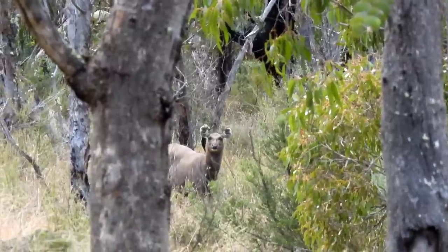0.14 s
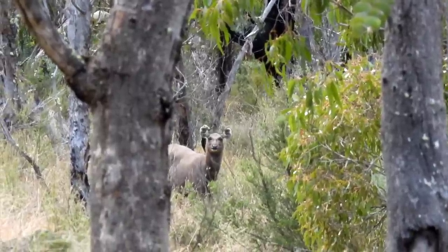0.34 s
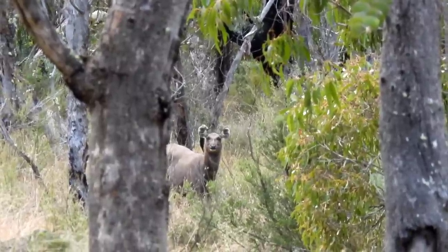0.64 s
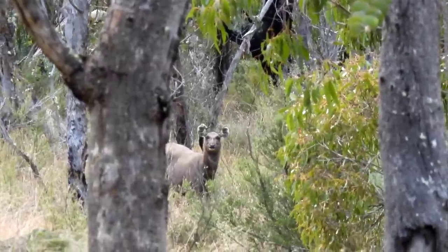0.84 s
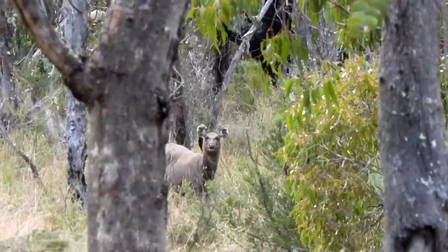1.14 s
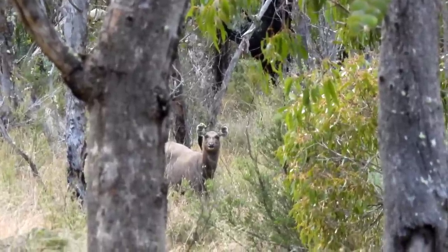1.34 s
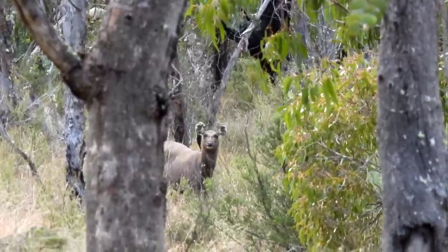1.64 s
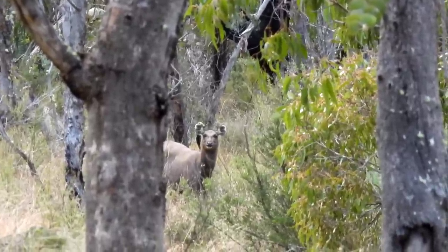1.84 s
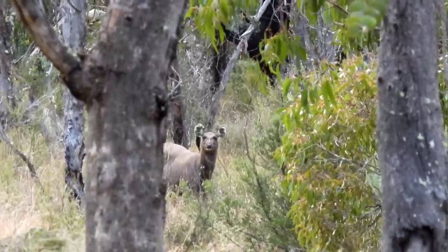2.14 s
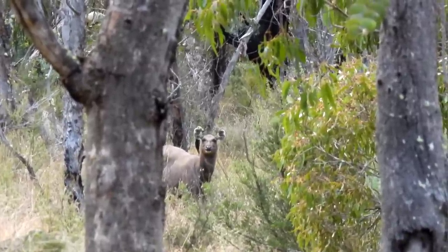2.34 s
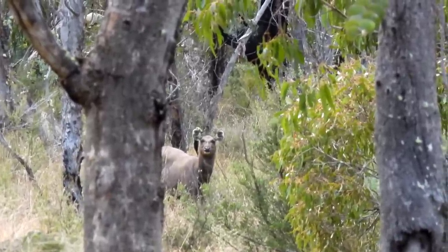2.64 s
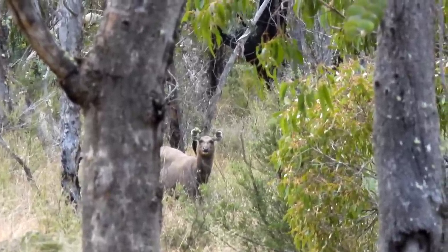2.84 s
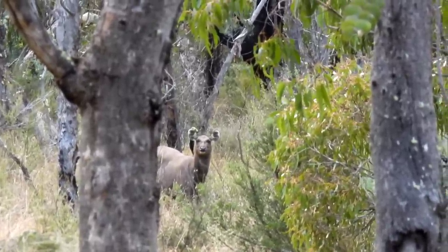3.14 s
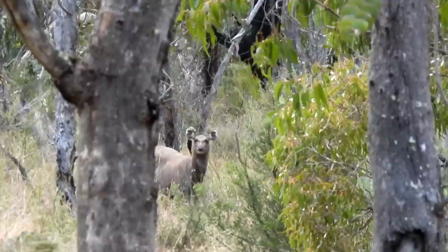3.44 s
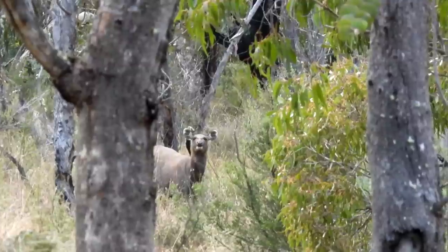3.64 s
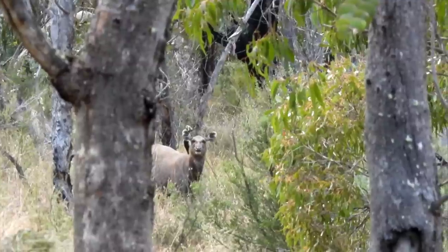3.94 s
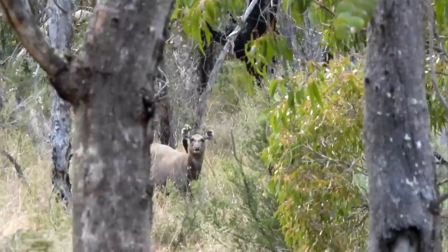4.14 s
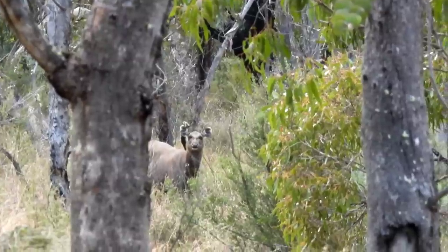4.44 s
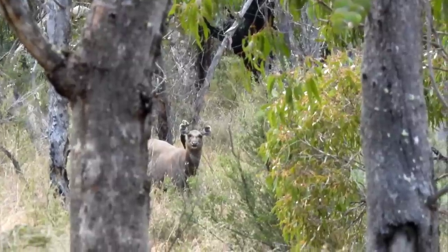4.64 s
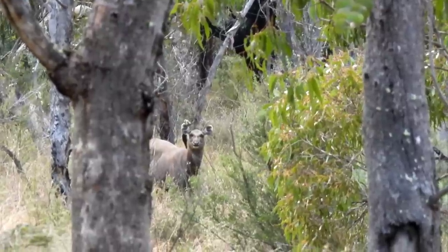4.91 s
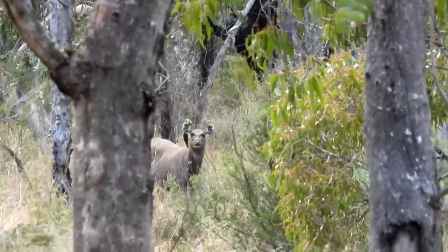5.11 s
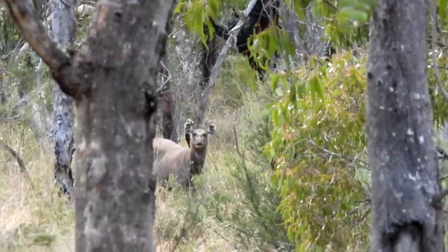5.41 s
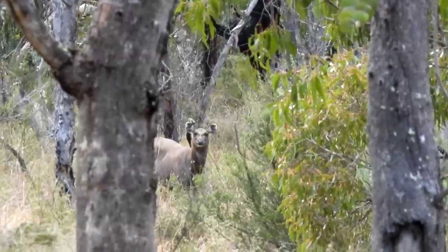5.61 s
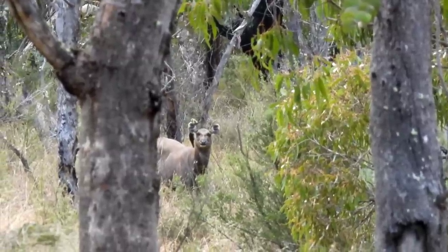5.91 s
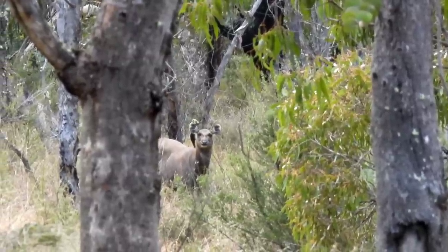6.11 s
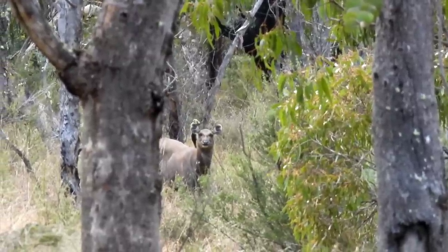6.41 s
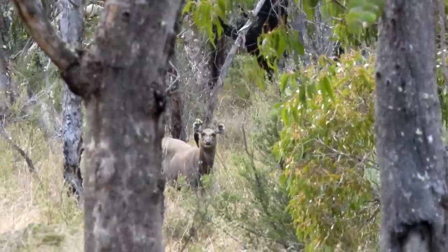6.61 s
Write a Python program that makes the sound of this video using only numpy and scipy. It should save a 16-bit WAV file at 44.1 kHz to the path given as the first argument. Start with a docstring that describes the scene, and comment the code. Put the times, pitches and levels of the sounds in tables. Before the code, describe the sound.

In open bushland, dry grass swishes and twigs tick close to the microphone during the first second over a soft steady breeze. A bird repeats short arched whistles while tiny high calls come faintly. Midway, a deer barks once, very short and loud, rasping then honking, with quick echoes off the trees. Afterwards a twig snaps and rapid high chips crowd in.

```python
"""Open bushland: at first dry grass swishes close by and twigs tick, over a steady breeze in the leaves.
A bird spread wide across the channels repeats an arched whistle; small birds call high up: gliding near-sines.
At 4 s a deer barks once: fold pulses and air noise ring its throat, then break into a clear honk.
Stands of trees throw the bark back as echoes and scatter; afterwards quick chips crowd in and a twig snaps."""
import sys
import numpy as np
from scipy import signal
from scipy.fft import rfft, irfft
from scipy.io import wavfile
from scipy.ndimage import uniform_filter1d, minimum_filter1d

SR = 44100
rng = np.random.default_rng(int(sys.argv[2]) if len(sys.argv) > 2 else 0)


def digitize_waveform(pressure):
    """Quantize a signal to 16-bit integers and store it at the path in sys.argv[1].

    Rows of a 2-D input are taken as channels; values are limited to [-1, 1].
    """
    field = np.atleast_2d(pressure).T
    bounded = np.clip(field, -1, 1)
    quanta = np.round(bounded * 32767).astype(np.int16)
    wavfile.write(sys.argv[1], SR, quanta)


N = 298116
TIME = np.arange(N) / SR


def amp(db):
    """Level law: decibels to amplitude gain."""
    return 10 ** (np.asarray(db) / 20)


def evened(x):
    """Power normalization: scales to rms 1."""
    return x / np.sqrt(np.mean(x ** 2) + 1e-20)


def read(points, hz):
    """Interpolation on a logarithmic frequency axis."""
    f, value = np.transpose(points)
    return np.interp(np.log(hz + 1), np.log(f + 1), value)


def add(mix, s, sound):
    """Superposition: adds a sound to the mix at second s."""
    start = round(s * SR)
    sound = sound[max(-start, 0):]
    part = mix[max(start, 0):][:len(sound)]
    part += sound[:len(part)]


def colour(x, points):
    """Linear filtering: multiplies the spectrum by a table of hz, gain_db."""
    hz = np.fft.rfftfreq(x.shape[-1], 1 / SR)
    return irfft(rfft(x) * amp(read(points, hz)), x.shape[-1])


def resonate(x, hz, width):
    """A resonance as a frequency-shifted one-pole filter; its centre may move."""
    turn = np.exp(2j * np.pi * np.cumsum(hz * np.ones(len(x))) / SR)
    r = np.exp(-np.pi * width / SR)
    baseband = signal.lfilter([1 - r], [1, -r], x / turn + 1e-18)
    return 2 * (turn * baseband).real


def wander(t, per_s):
    """Random modulation of about unit size: straight lines between per_s normal draws a second."""
    return np.interp((t - t[0]) * per_s, np.arange(512), rng.standard_normal(512))


def stereo(mid, side, left_db):
    """Sum and difference: left and right from a common and a differing part."""
    return np.array([(mid + side) * amp(left_db / 2), (mid - side) * amp(-left_db / 2)])


def scatter(x, t60_scale, build_s):
    """Diffuse scattering off trunks and leaves: sparse taps in two channels, each band decaying at its own rate."""
    # decay of the bush before scaling: hz, t60_s
    bush_t60 = [(200, 0.36), (1300, 0.92), (2700, 0.71), (4500, 0.8), (9000, 0.58)]
    taps = rng.choice([-1., 1.], (2, SR)) * (rng.random((2, SR)) < 3000 / SR)
    hz, t, z = signal.stft(taps, SR, nperseg=256)
    decay = amp(-60 * t / (t60_scale * read(bush_t60, hz)[:, None]))
    build_up = 1 - np.exp(-t / build_s)
    tail = signal.istft(z * decay * build_up, SR, nperseg=256)[1]
    return signal.fftconvolve(x[None], tail / np.linalg.norm(tail[0]), axes=1)[:, :len(x)]


def drifted(x, sway_s):
    """Phase modulation: moving air and leaves keep changing the path length, which blurs clear tones."""
    return np.interp(TIME + sway_s * wander(TIME, 60), TIME, x)


def deer():
    """Direct and scattered sound: the bark from near the middle, with near scatter, echoes and a faint tail."""
    # colour of the tail: hz, gain_db
    tail_colour = [(300, -4.5), (800, -4), (1000, -4), (1350, -4.5), (1900, 4.5), (2700, -2), (3500, 3),
                   (5000, -3), (9000, -12.5)]
    voice = bark()
    near = amp(-14.5) * scatter(voice, t60_scale=0.25, build_s=0.0081)
    far = amp(-18.0) * scatter(colour(voice, tail_colour), t60_scale=1.9, build_s=0.022)
    mid = voice + near[0] + drifted(echoes(voice), sway_s=.00005) + drifted(far[0], sway_s=0.00024)
    return stereo(mid, amp(-4) * (near[1] + far[1]), left_db=1.5)


def bark(puff_cycles=1.0, jitter=0.011, first_pulse=.06, honk_rough=0.086):
    """Source and filter: slaps of the vocal folds with puffs of air ring the throat, then clear to a tone."""
    # throat resonances before the mouth opening shifts them: hz, width_hz, relative_level_db
    throat_modes = [(312, 82, -52.5), (927, 61, -33), (1550, 154, -16), (1820, 250, -22.5),
                    (2614, 350, -19.5), (3270, 170, -30), (4700, 350, -37.5), (8460, 1100, -46)]
    # partials of the honk: multiple_of_pitch, relative_level_db
    honk_partials = [(2, -41.5), (3, -52.5), (4, -43), (6, -13.5), (8, -9), (9, -28), (10, -17), (11, -33),
                     (12, -38), (15, -28), (16, -34)]

    # one push of air
    attack_s, hold_s, release_s = 0.022, 0.031, .026
    t = np.arange(0, attack_s + hold_s + release_s, 1 / SR)
    released = np.maximum(t - attack_s - hold_s, 0) / release_s
    effort = np.minimum(t / attack_s, 1) * amp(0.5 - 15.5 * released)

    # partway through, the rasp breaks into the honk: 0 in the rasp, 1 in the honk
    break_after_s, break_s = .036, 0.0029
    clear = 1 / (1 + np.exp((break_after_s - t) / break_s))

    # the pitch climbs as the folds tighten, then holds; jitter fades as the tone clears
    slack_hz, tight_hz, tighten_s = 137.9, 167.26, .033
    hz = np.interp(t, [0, tighten_s], [slack_hz, tight_hz])
    turns = first_pulse + np.cumsum(hz * (1 + jitter * (1 - clear) * wander(t, 200))) / SR
    slaps = np.diff(np.floor(turns), prepend=0)
    puffs = (.2 + np.exp(-(turns % 1) / puff_cycles)) * rng.standard_normal(len(t))
    rasp_air, honk_air = .4, .7  # weight of the air noise
    airy = rasp_air + (honk_air - rasp_air) * clear
    drive = (1 - airy) * evened(slaps) + airy * evened(puffs)

    mouth = 0.96 + 1.36 * t  # the opening mouth raises the resonances
    bright_db = 1.5 * (1 - 2 * clear)  # the treble sinks as the tone clears
    rasp = np.zeros(len(t))
    for f, width, db in throat_modes:
        ringing = resonate(resonate(drive, f * mouth, width), f * mouth, 2 * width)
        rasp += amp(db + bright_db * (f > 2000)) * evened(ringing)

    honk = np.zeros(len(t))
    for k, db in honk_partials:
        partial = np.sqrt(2) * np.sin(2 * np.pi * (round(k) * turns + rng.random()))
        honk += amp(db) * partial * (1 + honk_rough * wander(t, 260))

    rasp_left_db, honk_db, honk_early_db = -6.5, -2.5, -23  # the early share already sounds in the rasp
    rasp_part = amp(rasp_left_db * clear) * rasp
    honk_part = amp(honk_db) * np.maximum(clear, amp(honk_early_db)) * honk
    out = np.zeros(N)
    add(out, 3.999, effort * (rasp_part + honk_part) * signal.windows.tukey(len(t), .04))
    # distance dulls the bark above this corner in Hz
    return signal.sosfilt(signal.butter(2, 10500, fs=SR, output="sos"), out)


def echoes(x, smear=1.0):
    """Delayed reflection: each stand of trees returns a firm echo and a smear from the trunks around it."""
    # stands of trees: delay_s, relative_level_db, spread_s
    stands = [(0.063, -13.5, 0.011), (.125, -25, .02), (0.191, -26.5, .02), (0.256, -28, .02),
              (.43, -38, .04), (0.548, -35.5, .06)]
    # colour of the echoes: hz, gain_db
    echo_colour = [(100, -12), (330, 10), (1000, 2), (1400, -6), (2000, 4.5), (2700, -10), (5000, -5.5),
                   (9000, -22)]
    t, response = np.arange(SR // 4) / SR, np.zeros(SR)
    for delay, db, spread in stands:
        trunks = rng.standard_normal(len(t)) * np.exp(-t / spread)
        add(response, delay - spread / 2, amp(db) * smear * trunks / np.linalg.norm(trunks))
        add(response, delay, amp([db]))
    return colour(signal.fftconvolve(x, response)[:N], echo_colour)


def whistler():
    """Opposed phase: a bird whose direct sound is nearly opposed in the two channels, spread wide."""
    # whistles before mixing: start_s, top_pitch_hz, relative_level_db
    whistles = [(-.11, 5260, -47.5), (1.126, 5330, -45), (1.782, 5220, -43.5), (2.938, 5150, -46),
                (3.78, 4970, -44.5), (4.702, 4878, -43), (5.21, 4425, -42)]
    # each whistle is softer at the top of its arch
    song = notes(whistles, length_s=.094, peak=.56, bend=.27, taper=0.18,
                 waver=0.0086, waver_per_s=250, top_db=-4.0)
    wet = bush(song, near_db=-1.0, far_db=4.0, t60_scale=0.89)
    mid = amp(-2.5) * (amp(-5.5) * song + wet[0])
    side = amp(1.5) * (wet[1] - amp(5) * song)
    return stereo(mid, side, left_db=-2.0)[:, SR:]


def notes(rows, length_s, peak, bend, taper, waver, waver_per_s, top_db=0):
    """Frequency modulation: near-sine notes on a pitch arch that tops at the share peak of the length."""
    out = np.zeros(N + SR)  # the track starts one second early
    t = np.arange(0, length_s, 1 / SR)
    below_top = ((t / length_s - peak) / max(peak, 1 - peak)) ** 2
    swell = signal.windows.tukey(len(t), taper) * amp(top_db * (1 - below_top) ** 2)
    for s, top_hz, db in rows:
        hz = top_hz * (1 - bend * below_top) * (1 + waver * wander(t, waver_per_s))
        add(out, s + 1, amp(db) * swell * np.sin(2 * np.pi * np.cumsum(hz) / SR))
    return out


def bush(song, near_db, far_db, t60_scale):
    """Multiple scattering: short scatter from twigs around the bird plus longer scatter from the whole bush."""
    near = amp(near_db) * scatter(song, t60_scale=0.22, build_s=.004)
    return near + amp(far_db) * scatter(song, t60_scale=t60_scale, build_s=0.0018)


def small_birds():
    """Glide and flutter of pitch set apart chips, thin calls, scolds, low notes and hoarse calls in the bush."""
    # all before mixing: start_s, top_pitch_hz (before flutter), relative_level_db
    # quick rising chips
    chip_rows = [(3.052, 7080, -54.5), (5.52, 7000, -54), (5.568, 8210, -54), (5.68, 8350, -53),
                 (5.748, 7480, -52.5), (5.814, 6870, -53), (5.985, 6730, -53), (6.032, 8260, -52),
                 (6.138, 8300, -52.5), (6.205, 7200, -52), (6.27, 6850, -48.5), (6.425, 7830, -58),
                 (6.482, 7200, -56)]
    # thin, sagging calls at set times
    thin_rows = [(.11, 7170, -53), (1.64, 8600, -57), (2.37, 8150, -57.5), (2.9, 8600, -59.5),
                 (3.87, 9100, -65), (4.29, 8760, -59.5), (4.66, 8300, -59), (6.6, 8200, -58.5)]
    # short scolding buzzes
    scold_rows = [(2.007, 7970, -45), (3.35, 7770, -50), (4.54, 8200, -50), (4.77, 7880, -50),
                  (5.115, 8060, -50.5)]
    # soft low notes of a farther bird
    low_rows = [(1.91, 2650, -47.5), (2.03, 2950, -50), (2.08, 3620, -53), (2.135, 4380, -51)]
    # hoarse calls of a distant bird
    hoarse_rows = [(2.6, 1880, -50), (6.49, 2460, -54), (6.58, 1827, -48.5)]

    chips = notes(chip_rows, length_s=0.029, peak=0.96, bend=.18, taper=0.65, waver=0.022, waver_per_s=694)
    thin = notes([*thin_rows, *flock()], length_s=.13, peak=0, bend=0.097, taper=.3,
                 waver=.035, waver_per_s=1100)
    scolds = notes(scold_rows, length_s=0.033, peak=0, bend=0.15, taper=.3, waver=.07, waver_per_s=1100)
    low = notes(low_rows, length_s=0.0383, peak=0.84, bend=.18, taper=0.76, waver=0.036, waver_per_s=484)
    hoarse = notes(hoarse_rows, length_s=.15, peak=0, bend=0.097, taper=0.25, waver=.16, waver_per_s=1100)
    calls = thin + scolds + low + hoarse
    wet = bush(chips + amp(-5.5) * calls, near_db=-8.0, far_db=-2, t60_scale=0.97)
    mid = amp(-2.0) * chips + amp(-8.5) * calls + wet[0]
    return stereo(mid, amp(-14) * wet[1], left_db=0.5)[:, SR:]


def flock():
    """Random timing: more thin calls at random times, as rows of start_s, top_pitch_hz, relative_level_db."""
    calls_per_s, centre_hz, spread_hz, centre_db, spread_db = 2.2, 8300, 300, -60.5, 2
    rows = []
    for k, (when, pitch, level) in enumerate(rng.uniform(-1, 1, (40, 3))):
        start_s = (k + when / 2) / calls_per_s
        rows.append((start_s, centre_hz + spread_hz * pitch, centre_db + spread_db * level))
    return rows


def grass(grain_db=1.5, grains_per_s=5000):
    """Friction as a grain process: dry stalks brush past each other in a dense crackle of uneven grains."""
    # spectrum of the crackle: hz, relative_db_per_hz
    grass_colour = [(100, -39), (700, -16.5), (1300, 8), (2100, -17), (3400, 0.5), (5000, -9.5),
                    (6100, -9.5), (6600, -3), (9500, -14), (12000, -23.5), (15000, -17.5)]
    # swishes before mixing: height_s (time of the maximum), relative_level_db, rise_s, fall_s
    swish_rows = [(.28, -57.5, .07, 0.13), (.53, -51, 0.1, 0.14), (.74, -51, 0.094, 0.061),
                  (.935, -53.5, 0.033, 0.1)]
    sizes = amp(grain_db * np.minimum(rng.exponential(1, (2, N)), 5)) * rng.standard_normal((2, N))
    struck = rng.random((2, N)) < grains_per_s / SR
    mid, side = evened(colour(sizes * struck, grass_colour))
    power = amp(-68.5) ** 2  # the grass never quite stops stirring
    for s, db, rise, fall in swish_rows:
        swish = amp(db) * np.exp(-((TIME - s) / np.where(TIME < s, rise, fall)) ** 2)
        power = power + swish ** 2
    return np.sqrt(power) * stereo(mid, amp(-9) * side, left_db=2.0)


def twigs(snap_s=0.0012, ring_swell_s=0.00048):
    """Impulse and damped mode: each twig or stalk gives a sharp noise snap and a very short woody ring."""
    # twigs before mixing: start_s, ring_peak_db, ring_hz, snap_db (re the ring)
    twig_rows = [(.03, -35.5, 1412, -16), (.354, -35, 1450, -22), (.381, -42, 3420, -7),
                 (.508, -33, 1410, -4), (.539, -43, 6960, -1), (.7625, -48, 7200, -6),
                 (.772, -30.5, 1440, -8.5), (.8346, -38.5, 1120, -8), (.923, -34, 1250, -8),
                 (.983, -35.5, 1280, -25), (1.529, -33, 2790, -12), (1.537, -33, 2820, -21),
                 (5.494, -30.5, 1074, -22)]
    # spectrum of the snap: hz, relative_db_per_hz
    snap_colour = [(100, -45), (700, -12), (1300, -3), (3400, 7.5), (7000, -5), (14000, -9)]
    ring_t60_s = .0095
    t, out = np.arange(2048) / SR, np.zeros(N)
    for s, db, hz, snap_db in twig_rows:
        ring = np.sin(2 * np.pi * hz * t) * amp(-60 * t / ring_t60_s) * (1 - np.exp(-t / ring_swell_s))
        snap = evened(colour(rng.standard_normal(len(t)), snap_colour)) * np.exp(-t / snap_s)
        add(out, s, amp(db) * (ring / abs(ring).max() + amp(snap_db) * snap))
    wet = amp(-12.5) * scatter(out, t60_scale=0.2, build_s=0.0013)
    return stereo(out + wet[0], amp(-4) * wet[1], left_db=3.0)


def breeze():
    """Partly coherent noise: a steady wash of far foliage that swells a little."""
    # spectrum common to both channels: hz, relative_db_per_hz
    common_spectrum = [(35, -83), (60, -77), (207, -11.5), (277, -10.5), (508, -2.5), (594, -2), (761, 0.5),
                       (1250, -2), (2140, -16), (3510, -17.5), (4290, -23.5), (5500, -26.5), (6580, -26.5),
                       (7880, -33), (12900, -42.5), (16800, -85), (22000, -120)]
    # spectrum of the difference between them: hz, relative_db_per_hz
    side_spectrum = [(35, -78.5), (60, -38.5), (265, -9.5), (543, -4.5), (636, -4), (996, 0.5),
                     (1330, -2.5), (1670, -5), (4390, -9), (6020, -9), (6580, -33), (8240, -39),
                     (9430, -42), (11000, -29.5), (12900, -39), (16800, -70), (22000, -120)]
    mid = leaf_noise(common_spectrum, patchy_db=1.54)
    side = amp(-11.5) * leaf_noise(side_spectrum, patchy_db=-0.1)
    level_db = -49.5 + 0.46 * wander(TIME, per_s=2.2)
    return amp(level_db) * stereo(mid, side, left_db=1.1)


def leaf_noise(spectrum, patchy_db):
    """Spectral shaping of random noise, its level drifting in small patches of time and frequency."""
    hz = np.fft.rfftfreq(1024, 1 / SR)
    a, b, patches = rng.standard_normal((3, N // 256 + 5, len(hz)))
    patches = evened(uniform_filter1d(uniform_filter1d(patches, 14, 0), 12, 1))
    z = (a + 1j * b) * amp(read(spectrum, hz) + patchy_db * patches)
    return evened(signal.istft(z.T, nperseg=1024, noverlap=768)[1][:N])


def scene():
    """Superposition of everything heard in the bush."""
    return deer() + whistler() + small_birds() + breeze() + grass() + twigs()


def record(dry):
    """Band limiting and gain control: a low cut against wind, a soft top, a peak limiter and a high cut."""
    # treble response of the microphone: hz, gain_db
    mic_top = [(9000, 0.5), (11000, -2.5), (12500, -9), (14000, -13.5)]
    wind_cut_hz, edge_hz, ceiling = 160, 14000, .93
    wind_cut = signal.butter(3, wind_cut_hz, "high", fs=SR, output="sos")
    x = colour(signal.sosfilt(wind_cut, dry), mic_top)
    allowed = ceiling / np.maximum(abs(x).max(0), ceiling)
    x = x * uniform_filter1d(minimum_filter1d(allowed, size=400), size=400)
    high_cut = signal.firwin(255, edge_hz, window=("kaiser", 8), fs=SR)
    return signal.oaconvolve(x, high_cut[None], "same")


dry = scene()
out = record(dry)
digitize_waveform(out)
```